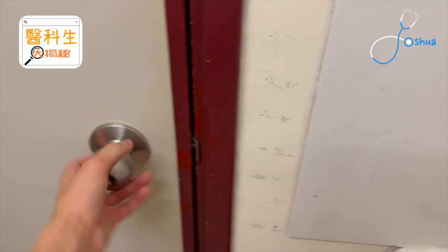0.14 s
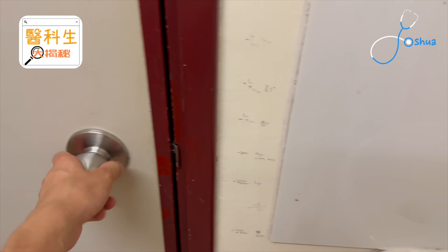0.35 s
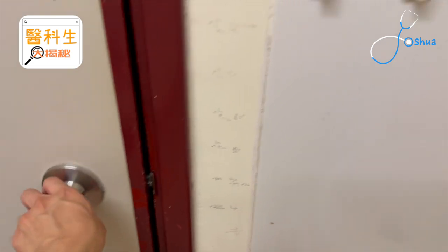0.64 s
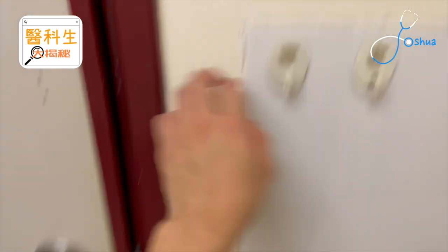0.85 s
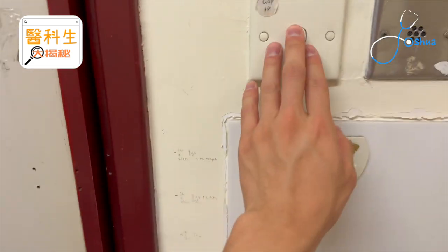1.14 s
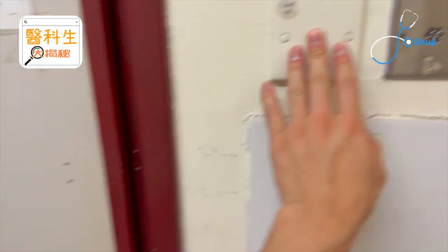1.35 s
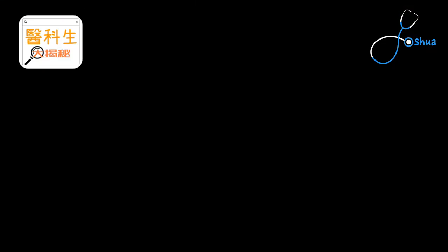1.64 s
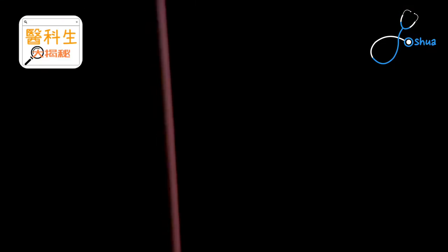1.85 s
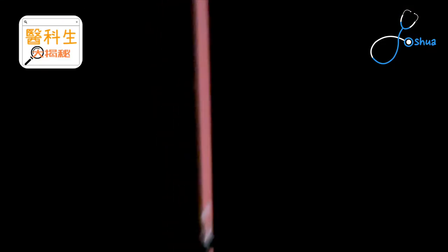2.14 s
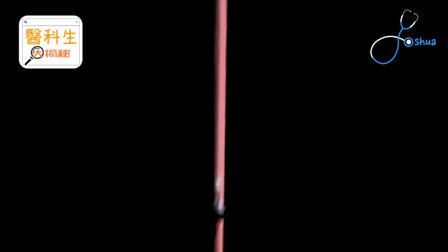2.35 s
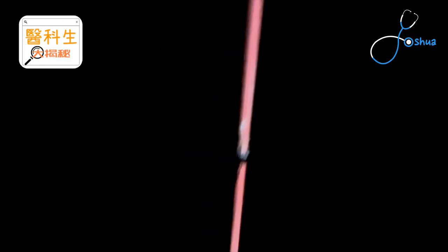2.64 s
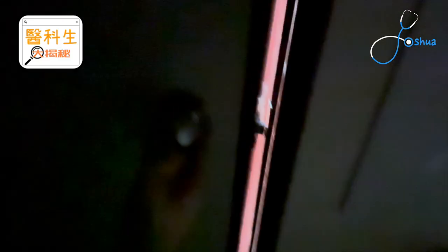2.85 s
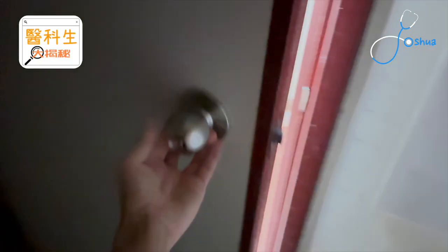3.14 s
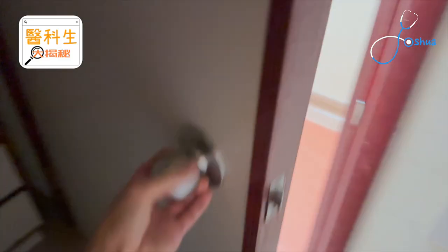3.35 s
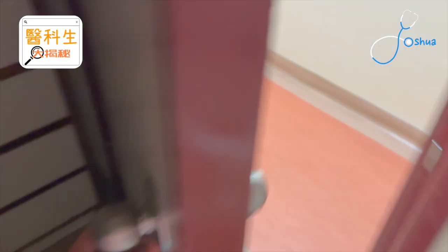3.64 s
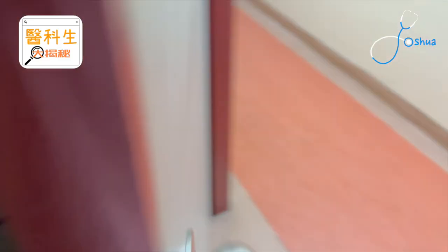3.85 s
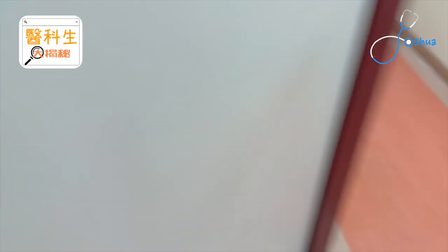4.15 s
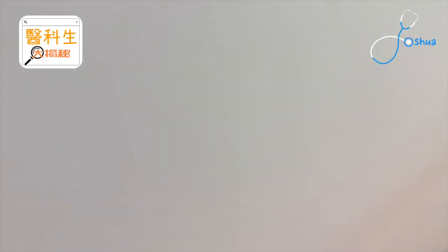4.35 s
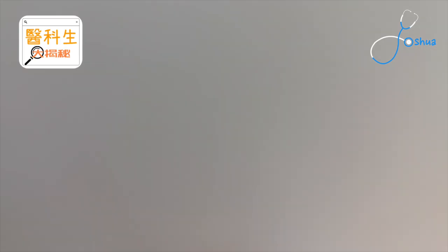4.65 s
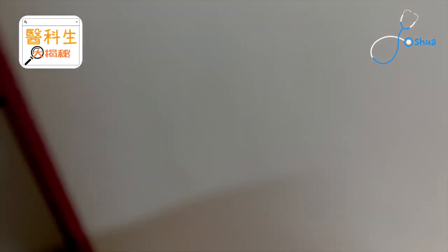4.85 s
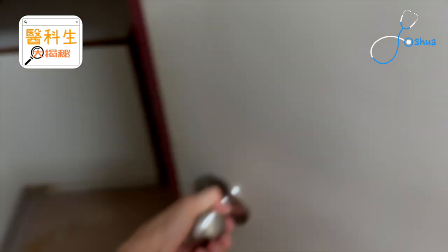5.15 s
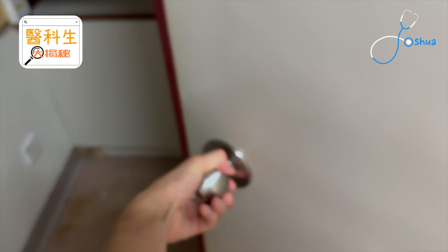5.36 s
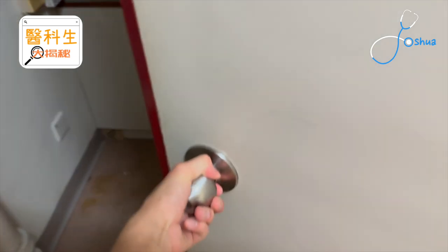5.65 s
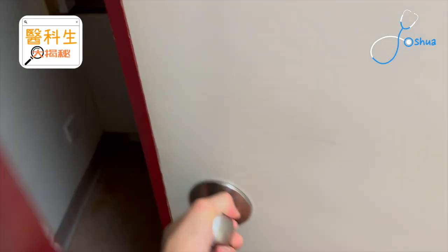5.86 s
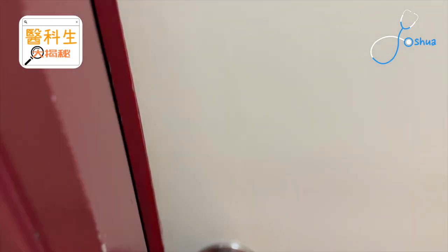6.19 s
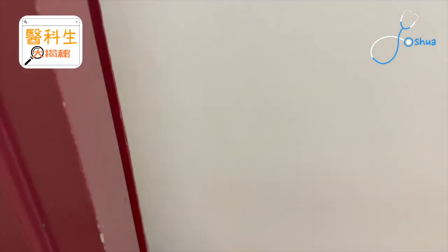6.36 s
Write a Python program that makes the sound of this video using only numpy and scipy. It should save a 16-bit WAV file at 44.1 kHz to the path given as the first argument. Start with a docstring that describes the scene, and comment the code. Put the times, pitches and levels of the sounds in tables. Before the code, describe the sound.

Close, handheld sound of door hardware indoors. Rapid metallic knob clicks and grinding come first, then a pause broken by a bright switch snap. More latch clicks follow with a thin ping, a second sharper snap, soft sliding, footsteps and hollow panel bumps. A short piercing hinge squeal bursts out, followed by a click and a closing thud, with short room reverberation and faint hush.

```python
"""Door knob, wall switch and dry hinge

A hand works the round knob of a wooden door in a small room, snaps a wall switch, unlatches and swings the door.
Struck metal, plastic and panel are noise cracks plus decaying modes; feet and door bump the same way.
Clothes, sliding and spindle are shaped friction noise; the hinge squeals at the end as a shaking high tone with rasp.
The carried microphone rumbles softly with movement, over the hush of the room.
"""
import sys
import numpy as np
from scipy import signal
from scipy.fft import rfft, irfft
from scipy.io import wavfile

SR = 44100
rng = np.random.default_rng(int(sys.argv[2]) if len(sys.argv) > 2 else 0)


def wav_out(sig):
    """Save sig, one row per channel (or a flat mono array), as 16-bit PCM at SR to the path in sys.argv[1]."""
    wavfile.write(sys.argv[1], SR, np.round(np.clip(np.atleast_2d(sig).T, -1, 1) * 32767).astype(np.int16))


N = 287532
T = np.arange(N) / SR


def undb(db):
    """Decibels to gain."""
    return 10 ** (np.asarray(db) / 20)


def unit(x):
    """Scale to rms 1."""
    return x / np.sqrt(np.mean(x ** 2))


def energy(x):
    """Scale to energy 1."""
    return x / np.linalg.norm(x)


def curve(rows, axis=1):
    """One column of a time table at every sample."""
    rows = np.array(rows)
    return np.interp(T, rows[:, 0], rows[:, axis])


def at_hz(points, hz):
    """Read (f/Hz, value) points on a log-frequency axis."""
    f, value = np.transpose(points)
    return np.interp(np.log(hz + 1), np.log(f), value)


def shaped(x, points):
    """Filter x by a gain curve of (f/Hz, level/dB) points."""
    hz = np.fft.rfftfreq(len(x), 1 / SR)
    return irfft(rfft(x) * undb(at_hz(points, hz)), len(x))


def walk(rate_hz):
    """Random motion with a spread near 1: straight lines between rate_hz random values a second."""
    return np.sqrt(3 / 2) * np.interp(T * rate_hz, np.arange(N), rng.standard_normal(N))


def band(x, hz, kind, order=3):
    """Causal Butterworth filter."""
    return signal.sosfilt(signal.butter(order, hz, kind, fs=SR, output="sos"), x)


def strokes(rows, attack_s, release_s):
    """Strength of a series of movements: each gathers speed, holds and dies away."""
    power = np.zeros(N)
    for start_s, length_s, db in rows:
        rise = np.sin(np.pi / 2 * np.clip((T - start_s) / attack_s, 0, 1)) ** 2
        fall = np.exp(-np.maximum(T - start_s - length_s, 0) / release_s)
        power += (undb(db) * rise * fall) ** 2
    return np.sqrt(power)


def rubbing(colour, strength, grain_db):
    """Friction: many tiny catches of unequal size, in a slightly uneven stroke."""
    catches = rng.standard_normal(N) * undb(grain_db * walk(1500))
    uneven = undb(1.2 * walk(30))
    return unit(shaped(catches, colour) * uneven) * strength


def squeak(hz, strength, wander, wander_rate_hz, flutter_db):
    """Stick and slip: one high tone whose pitch and strength shake."""
    shaking_hz = hz * (1 + wander * np.tanh(walk(wander_rate_hz)))
    flutter = undb(flutter_db * walk(wander_rate_hz))
    return strength * flutter * np.sin(2 * np.pi * np.cumsum(shaking_hz) / SR)


# decay of the room: (f/Hz, t60/s)
ROOM_DECAY = [(100, 0.59), (500, 0.44), (1400, 0.41), (4000, 0.38), (10000, 0.31), (16000, 0.053)]


def reverberation(gain, t, build_s):
    """Noise with a gain per frequency between close walls: builds within milliseconds, loses its treble first."""
    hz = np.fft.rfftfreq(len(t), 1 / SR)
    noise = rfft(rng.standard_normal(len(t))) * gain
    centres_hz = [f for f, _ in ROOM_DECAY]
    tail = 0
    # overlapping bands that sum to 1, each with its own decay
    for (_, t60_s), share in zip(ROOM_DECAY, np.eye(len(ROOM_DECAY))):
        weight = at_hz(list(zip(centres_hz, share)), hz)
        tail = tail + irfft(noise * weight, len(t)) * undb(-60 * t / t60_s)
    return energy(tail * (1 - np.exp(-t / build_s)))


def room(x, wet_db):
    """A lasting sound together with its reverberation."""
    response = reverberation(1, T[:SR // 2], build_s=0.0065)
    return x + undb(wet_db) * signal.fftconvolve(x, response)[:N]


def body(modes, t):
    """The few long modes of a struck thing, excited a little differently by every blow."""
    ring = np.zeros(len(t))
    for hz, db, t60_s in modes:
        decay = undb(db + 2 * rng.standard_normal() - 60 * t / t60_s)
        ring += decay * np.sin(2 * np.pi * hz * t * rng.normal(1, 0.0047))
    return energy(ring)


def contact_colour(crack, focus_hz, focus_db, patchy_db, hz):
    """The spot that is struck favours some of the many damped resonances, one above all."""
    knots_hz = np.arange(0, SR / 2, 130)
    patches = np.interp(hz, knots_hz, rng.standard_normal(len(knots_hz)))
    focus = np.exp(-((hz - focus_hz) / (55 + 0.098 * focus_hz)) ** 2)
    return undb(at_hz(crack, hz) + patchy_db * patches + focus_db * focus)


def blows(rows, modes, crack, focus_db, ring_db, near_db, near_s, tail_db):
    """Contacts crack, ring modes and fill the room; where and how hard each lands sets bass, middle, treble."""
    out = np.zeros(N + SR)
    t = T[:SR // 2]
    hz = np.fft.rfftfreq(len(t), 1 / SR)
    attack = SR // 50  # samples over which the band levels hold
    for s, middle_db, bass_db, treble_db, contact_s, focus_hz in rows:
        gain = contact_colour(crack, focus_hz, focus_db, patchy_db=4.2, hz=hz)
        # the parts catch and slip in uneven jolts of about a millisecond
        jolts = undb(4.5 * np.interp(t * 900, np.arange(len(t)), rng.standard_normal(len(t))))
        grind, echoes = irfft(rfft(rng.standard_normal((2, len(t)))) * gain, len(t))
        age = t / max(contact_s, 1e-4)
        direct = energy(grind * jolts * (1 - np.exp(-3 * age)) * np.exp(-age))
        ring = body(modes, t)
        # door leaf, frame and wall answer first, then the whole room
        near = energy(echoes * (1 - np.exp(-age)) * np.exp(-t / near_s))
        tail = reverberation(gain, t, build_s=0.014)
        hit = direct + undb(ring_db) * ring + undb(near_db) * near + undb(tail_db) * tail
        parts = band(hit, 700, "low"), band(hit, [700, 3700], "band"), band(hit, 3700, "high")
        start = int(s * SR)
        for part, db in zip(parts, (bass_db, middle_db, treble_db)):
            out[start:start + len(t)] += part * undb(db) / np.std(part[:attack])
    return out[:N]


# hush spectrum: (f/Hz, relative level/dB per Hz)
AIR_COLOUR = [(100, 3.5), (160, -1.5), (250, -11), (400, -8.5), (600, -27), (2000, -33.5), (3500, -54),
              (6000, -55), (16000, -66.5)]


def still_air(level_db):
    """The steady hush of the room: shaped noise."""
    hush = band(rng.standard_normal(N), 60, "high")
    return unit(shaped(hush, AIR_COLOUR)) * undb(level_db)


# rumble spectrum: (f/Hz, relative level/dB per Hz)
RUMBLE_COLOUR = [(20, -49), (32, -24), (41, -5.5), (52, 7.5), (63, 0.5), (76, 5), (110, -9), (150, -4),
                 (210, -22.5), (400, -47), (2000, -61.5), (16000, -65)]
# reaches and strides that shake the microphone: (start t/s, length/s, level/dB)
BODY_MOVES = [(.15, .43, -35.5), (.8, 0.14, -36.5), (1.54, 0.24, -42), (2.17, .36, -35), (2.78, 0.41, -38),
              (3.3, 0.78, -44.5), (4.22, 0.93, -34), (4.7, 0.34, -32), (5.92, 0.057, -31.5),
              (6.17, 0.33, -36)]


def rumble(rest_db):
    """The carried microphone rumbles, more with every movement of the body."""
    shake = np.hypot(strokes(BODY_MOVES, attack_s=0.05, release_s=0.073), undb(rest_db))
    return unit(shaped(rng.standard_normal(N), RUMBLE_COLOUR)) * shake


# cloth spectrum: (f/Hz, relative level/dB per Hz)
SLEEVE_COLOUR = [(1500, -2), (4200, -13.5), (5600, -2.5), (6600, -1), (8000, -5.5), (9300, -12),
                 (12000, -20), (16000, -21)]
# sweeps of a sleeve: (start t/s, length/s, level/dB)
SLEEVE_SWEEPS = [(1.02, 0.21, -50), (3.55, 0.51, -44), (4.14, 0.13, -57.5), (4.78, 0.4, -51.5),
                 (5.62, .36, -49)]


def sleeve(rest_db):
    """Cloth hisses in slow swells as the arm sweeps."""
    strength = np.hypot(strokes(SLEEVE_SWEEPS, attack_s=0.15, release_s=0.083), undb(rest_db))
    return rubbing(SLEEVE_COLOUR, strength, grain_db=1.5)


# sliding spectrum: (f/Hz, relative level/dB per Hz)
SHUFFLE_COLOUR = [(100, 6), (220, 3.5), (480, 0.5), (800, -7.5), (1400, -12), (2400, -16.5), (4000, -24.5),
                  (10000, -29), (16000, -43)]
# hand and feet sliding on door and floor: (start t/s, length/s, level/dB)
SHUFFLES = [(-.05, 0.054, -40), (.6, .26, -35.5), (2.18, .3, -50.5), (2.85, .08, -48), (3.12, 0.63, -48.5),
            (3.8, 1.38, -42.5), (5.25, 1.08, -45), (6.25, 0.32, -35), (6.44, .08, -29.5)]


def shuffling(rest_db):
    """Dull sliding of hand and feet, never quite still."""
    strength = np.hypot(strokes(SHUFFLES, attack_s=0.048, release_s=0.13), undb(rest_db))
    return rubbing(SHUFFLE_COLOUR, strength, grain_db=1)


# steps and dull bumps on door and wall, band levels as rms of the first 20 ms:
# (t/s, middle level/dB, bass level/dB, treble level/dB, contact/s, strongest resonance f/Hz)
DULL_BUMPS = [(1.424, -42, -49, -45.5, 0.0019, 2700), (4.203, -56, -58, -51, 0.059, 3600),
              (4.461, -36, -30.5, -44, 0.022, 465), (4.728, -38, -28.5, -33.5, 0.0013, 6400),
              (4.744, -34, -24.5, -52, 0.0092, 2040), (4.795, -46, -23, -47, 0.0034, 334),
              (4.982, -42, -34, -39.5, .0078, 530), (4.993, -30.5, -31, -29.5, 0.0068, 1870),
              (5.576, -33, -26, -47, 0.0037, 202), (5.671, -64, -34.5, -51.5, 0.0075, 190),
              (5.969, -53.5, -47.5, -47, 0.0061, 10200), (6.287, -41.5, -35.5, -39, 0.0042, 547),
              (6.481, -28.5, -33, -36, 0.011, 516), (6.498, -23.5, -18.5, -41, 0.016, 1240)]
# door panel ring: (f/Hz, relative level/dB, t60/s)
DOOR_MODES = [(144, -26, 0.17), (209, -2.5, 0.053), (241, 9, 0.054), (390, -24, 0.035), (522, -5, 0.36),
              (750, 0, 0.32), (1323, 5, 0.054)]
# dense short crack of the panel: (f/Hz, relative level/dB)
DOOR_CRACK = [(60, -11), (220, 3.5), (450, -1.5), (700, -2), (1000, -4), (2300, -9.5), (4000, -27.5),
              (6400, -31), (8000, -34.5), (10000, -28.5), (15000, -45)]


def bumps():
    """Feet and door bump; the hollow panel rings."""
    return blows(DULL_BUMPS, DOOR_MODES, DOOR_CRACK,
                 focus_db=10.0, ring_db=-7, near_db=-3.0, near_s=.02, tail_db=-2)


# faint thin squeaks, one table each: (t/s, f/Hz, level/dB)
THIN_SQUEAKS = [
    [(2.64, 6350, -79), (2.715, 6800, -72), (2.79, 6510, -74)],
    [(5.14, 6200, -66), (5.28, 6600, -54), (5.315, 7050, -53), (5.35, 6473, -62)],
    [(5.12, 10100, -62), (5.22, 11000, -62), (5.32, 10400, -57.5), (5.40, 9680, -67), (5.46, 6900, -68),
     (5.56, 6500, -75.5)],
]


def thin_squeaks():
    """Faint gliding whistles as the door moves slowly."""
    out = np.zeros(N)
    for rows in THIN_SQUEAKS:
        sounding = (T > rows[0][0]) & (T < rows[-1][0])
        strength = sounding * undb(curve(rows, axis=2))
        out += squeak(curve(rows), strength, wander=.043, wander_rate_hz=70, flutter_db=5.0)
    return out


# twists of the knob against its spring: (start t/s, length/s, level/dB)
KNOB_TWISTS = [(-.02, 0.039, -37.5), (.14, 0.12, -37), (.38, .11, -35), (.6, 0.21, -33.5),
               (2.18, .1, -44.5), (2.84, 0.096, -40.5)]
# groan in lock case and door leaf: (f/Hz, relative level/dB per Hz)
GROAN_COLOUR = [(200, -31), (272, 5.5), (312, -19), (366, -2), (408, -10.5), (460, 7.5), (560, -12),
                (850, -28), (1330, -19.5), (1700, -20), (2400, -21), (6000, -44)]


def spindle():
    """The spindle groans in the lock case while the knob is twisted."""
    return rubbing(GROAN_COLOUR, strokes(KNOB_TWISTS, attack_s=0.019, release_s=0.051), grain_db=2)


# hard plastic snaps, band levels as rms of the first 20 ms:
# (t/s, middle level/dB, bass level/dB, treble level/dB, contact/s, strongest resonance f/Hz)
SWITCH_SNAPS = [(1.582, -20.5, -47.5, -15, .0011, 2750), (3.868, -25, -39.5, -28.5, 0.0063, 4130)]
# switch plate ring: (f/Hz, relative level/dB, t60/s)
SWITCH_MODES = [(1790, -5, 0.13), (2040, -7, .15), (2920, -5.5, 0.22), (4010, -4, .2), (4110, -1, 0.17),
                (10800, -7, .12)]
# dense short crack of the switch: (f/Hz, relative level/dB)
SWITCH_CRACK = [(200, -3.5), (600, -15), (1350, -11.5), (1800, 0), (2300, -1.5), (2800, 2), (3500, -10),
                (4100, 4), (4700, -12.5), (6400, -6.5), (8200, -8.5), (10000, -5.5), (12500, -15),
                (15500, -13.5)]


def snaps():
    """Hard plastic snaps crack and ring the switch plate."""
    return blows(SWITCH_SNAPS, SWITCH_MODES, SWITCH_CRACK,
                 focus_db=2.5, ring_db=-12.5, near_db=-2.0, near_s=0.027, tail_db=-6.5)


# spring bolt ring: (f/Hz, relative level/dB, t60/s)
BOLT_RING = [(7300, -3, 0.18), (7360, -11, .3), (7260, -3, 0.15), (7800, -7, .3)]


def bolt(start_s, energy_db):
    """The spring bolt pings thinly as it snaps out."""
    start = int(start_s * SR)
    return np.pad(undb(energy_db) * body(BOLT_RING, T[:N - start]), (start, 0))


# friction noise of the dry hinge: (f/Hz, relative level/dB per Hz)
HINGE_COLOUR = [(800, -9), (2700, -4.5), (5000, -4), (8000, -5), (10000, 10.5), (11800, 12.5), (13000, -8),
                (16000, -22)]
SQUEAL_START_S, SQUEAL_LENGTH_S, SQUEAL_SETTLED_DB = 6.228, 0.11, -21.5
SQUEAL_START_HZ, SQUEAL_SETTLED_HZ, SQUEAL_SETTLE_S = 12100, 10060, .011
SQUEAL_BITE_DB, SQUEAL_BITE_S = 19.5, .036  # extra pressure at break-loose, its decay


def squeal(rasp_db, drift):
    """The dry hinge breaks loose high and hard, then settles; tone and rasp share the same pressure."""
    age_s = np.maximum(T - SQUEAL_START_S, 0)
    fall_hz = (SQUEAL_START_HZ - SQUEAL_SETTLED_HZ) * np.exp(-age_s / SQUEAL_SETTLE_S)
    hz = (SQUEAL_SETTLED_HZ + fall_hz) * (1 + drift * walk(60))
    bite = undb(SQUEAL_BITE_DB * np.exp(-age_s / SQUEAL_BITE_S))
    swing = [(SQUEAL_START_S, SQUEAL_LENGTH_S, SQUEAL_SETTLED_DB)]
    pressure = bite * strokes(swing, attack_s=0.032, release_s=0.074)
    tone = squeak(hz, pressure, wander=0.048, wander_rate_hz=770, flutter_db=4.5)
    return tone + undb(rasp_db) * rubbing(HINGE_COLOUR, pressure, grain_db=4.5)


# knob, spindle and latch contacts, band levels as rms of the first 20 ms:
# (t/s, middle level/dB, bass level/dB, treble level/dB, grinding time/s, strongest resonance f/Hz)
LATCH_CLICKS = [(0.137, -37, -35.5, -43.5, 0.0092, 1350), (0.144, -37.5, -31.5, -37.5, 0.0039, 9800),
                (0.211, -38, -42, -50, 0.0031, 1530), (0.245, -38, -35.5, -45, 0.0042, 9500),
                (0.320, -32, -41, -43.5, 0.0056, 1660), (0.400, -39.5, -37, -49, .0056, 1250),
                (0.441, -32, -40, -40, 0.0024, 1260), (0.592, -31, -38, -25, 0.0023, 9100),
                (0.602, -23.5, -25.5, -25, 0.0035, 3570), (0.650, -25, -25.5, -36.5, 0.013, 1140),
                (0.728, -27, -41, -25, 0.0091, 13000), (0.758, -31, -34, -32, .0046, 4100),
                (0.784, -30.5, -28, -43, .021, 523), (0.812, -29.5, -36.5, -53, 0.008, 2880),
                (0.923, -45.5, -55, -50.5, .004, 2380), (2.163, -41.5, -38.5, -43, 0.01, 3680),
                (2.194, -40, -36.5, -53, 0.0038, 1450), (2.273, -39, -46, -52, .0028, 3740),
                (2.281, -31.5, -31, -35.5, 0.0044, 536), (2.427, -28, -31.5, -32, 0.0039, 1290),
                (2.437, -33, -24, -46, .0084, 830), (2.836, -51, -52, -70, .003, 2600),
                (2.855, -38.5, -37.5, -50, 0.0031, 365), (2.904, -31, -33.5, -26.5, .002, 11800),
                (3.069, -39, -38.5, -45, 0.0064, 362), (3.089, -31, -34, -53, 0.0097, 2180),
                (3.447, -50, -50, -53, 0.0062, 2050), (3.494, -50.5, -46, -55, 0.0066, 1194),
                (3.658, -43.5, -39.5, -49, .004, 2000), (6.392, -26, -31.5, -37, 0.0021, 2450)]
# knob ring: (f/Hz, relative level/dB, t60/s)
KNOB_RING = [(269.4, -5.5, 0.81), (375, 6, 0.41), (459, 5, 0.43), (525, -1.5, 0.3), (800, -14, 0.27),
             (1220, 2, 0.083), (1560, -42, 0.24), (2350, 16, 0.14), (3450, 10.5, 0.1), (6900, -76, .2),
             (9400, -10, 0.13)]
# dense short crack of the knob: (f/Hz, relative level/dB)
LATCH_CRACK = [(100, -17), (250, -9), (450, 0), (900, -2.5), (1400, 5), (2600, -1.5), (3700, -5.5),
               (5000, -4.5), (7400, -5.5), (8300, -9), (9600, -4), (12500, -11.5), (15500, -11)]


def latch():
    """Metal parts click and grind on each other and ring the knob."""
    return blows(LATCH_CLICKS, KNOB_RING, LATCH_CRACK,
                 focus_db=7.5, ring_db=-9, near_db=-.5, near_s=0.021, tail_db=-1.5)


def scene():
    """Door hardware, bumps, hinge and rustle in the room, over rumble and still air."""
    hardware = latch()
    switch = snaps()
    thuds = bumps()
    hinge = room(squeal(rasp_db=-15.5, drift=0.0119), wet_db=-3) + room(thin_squeaks(), wet_db=-9)
    handling = spindle() + shuffling(rest_db=-59) + sleeve(rest_db=-84) + rumble(rest_db=-45.5)
    ping = bolt(start_s=2.905, energy_db=-1.0)
    return (hardware + ping + switch + thuds + hinge + handling + still_air(level_db=-49))[None]


def record(dry):
    """The recorder clips at full scale and cuts the top above 16 kHz."""
    low_pass = signal.ellip(10, .2, 80, 16000, fs=SR, output="sos")
    return signal.sosfilt(low_pass, np.clip(dry, -1, 1))


dry = scene()
out = record(dry)
wav_out(out)
```